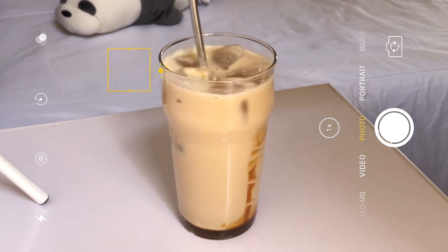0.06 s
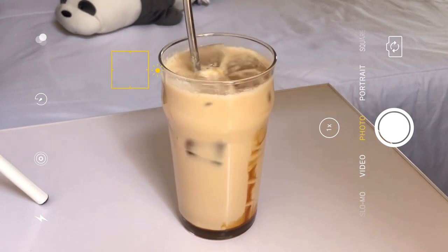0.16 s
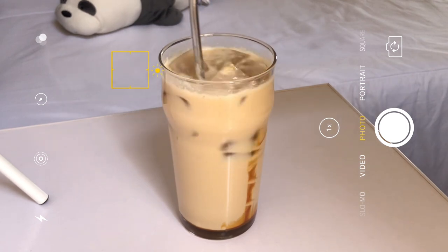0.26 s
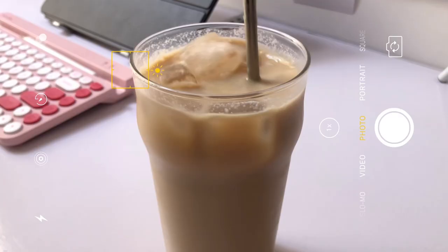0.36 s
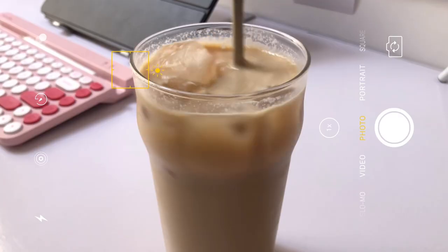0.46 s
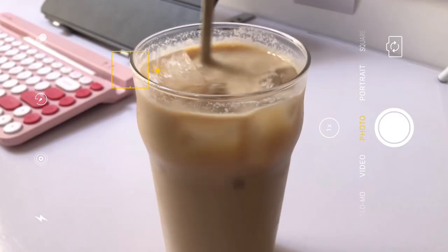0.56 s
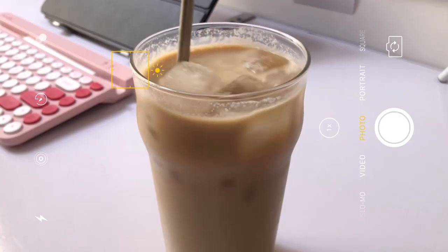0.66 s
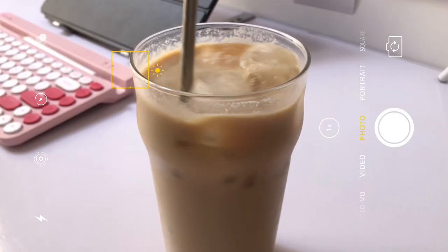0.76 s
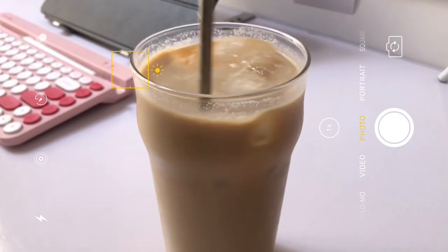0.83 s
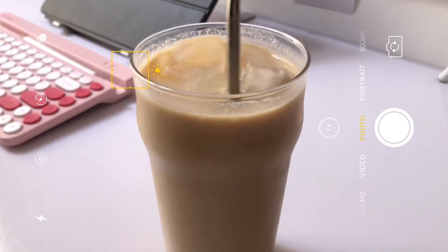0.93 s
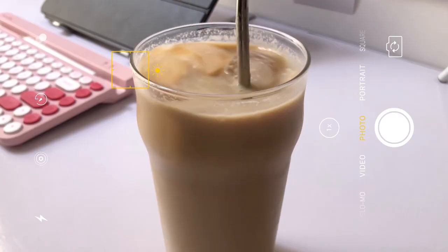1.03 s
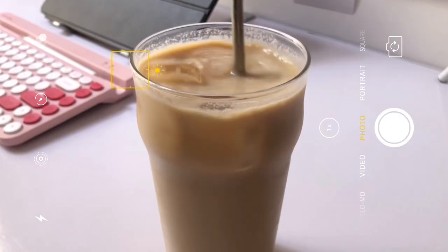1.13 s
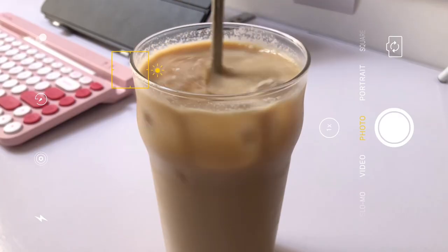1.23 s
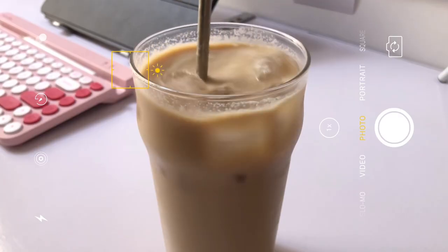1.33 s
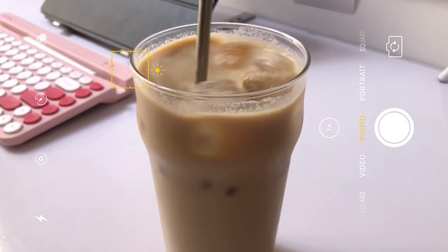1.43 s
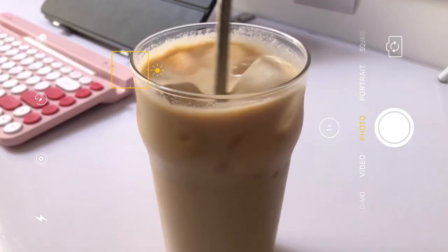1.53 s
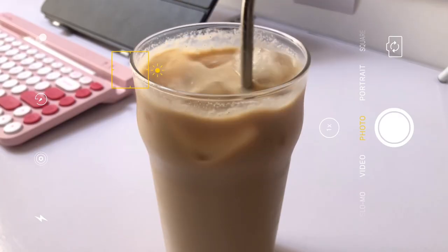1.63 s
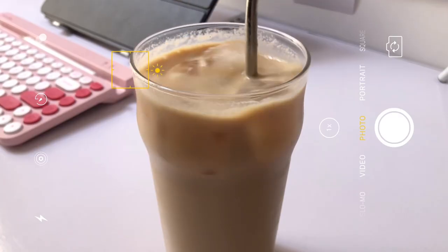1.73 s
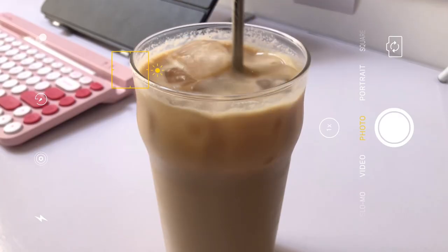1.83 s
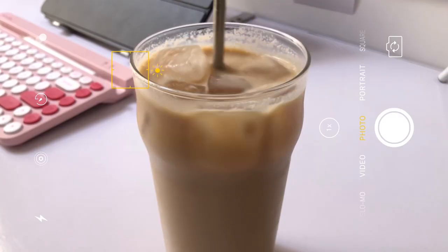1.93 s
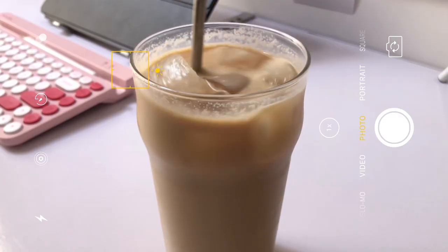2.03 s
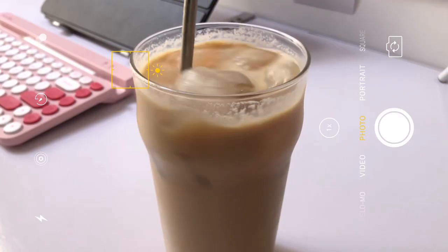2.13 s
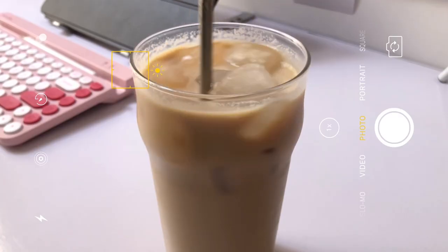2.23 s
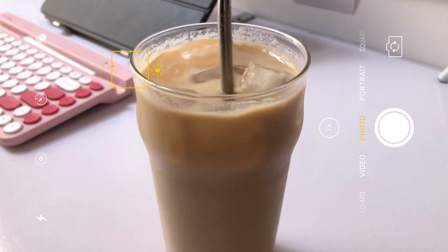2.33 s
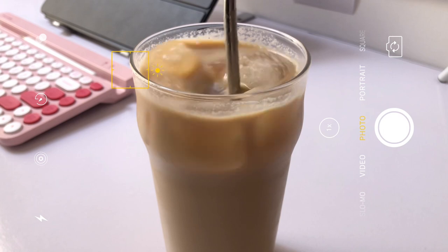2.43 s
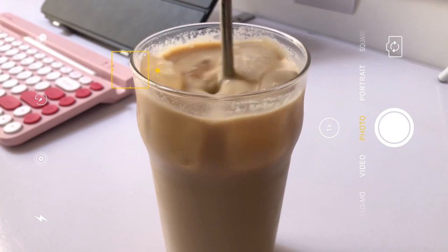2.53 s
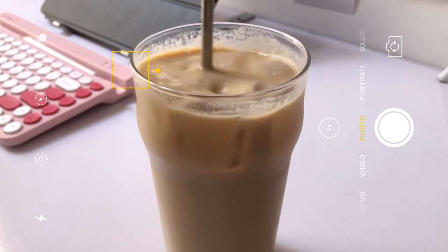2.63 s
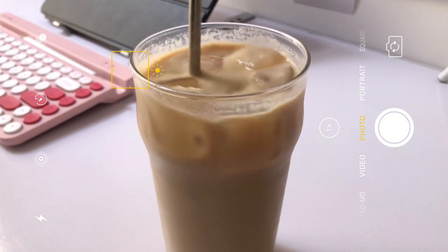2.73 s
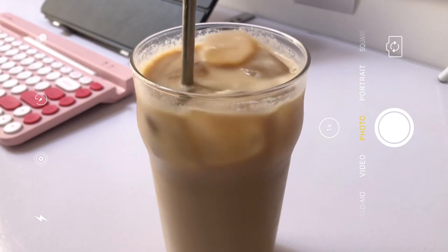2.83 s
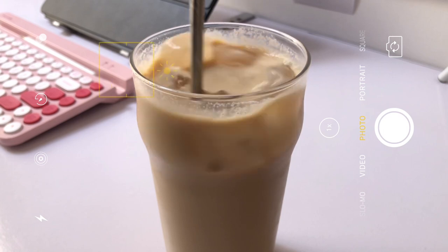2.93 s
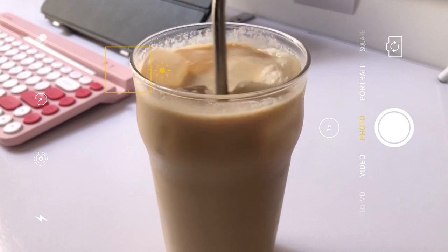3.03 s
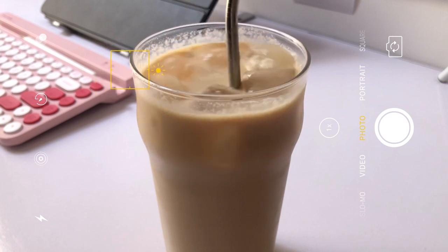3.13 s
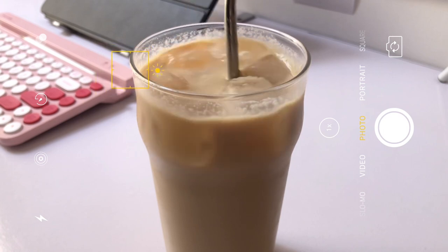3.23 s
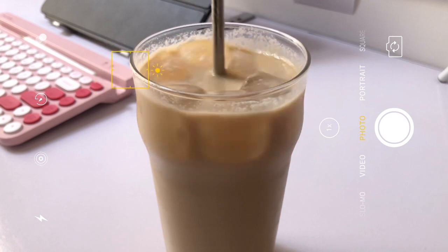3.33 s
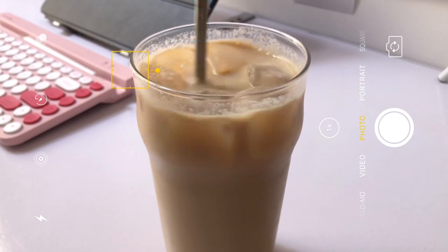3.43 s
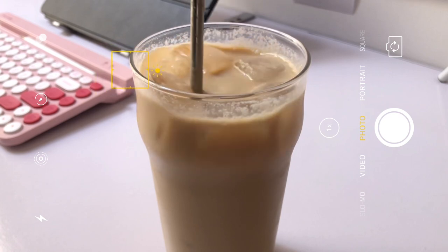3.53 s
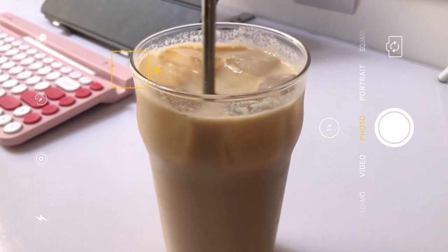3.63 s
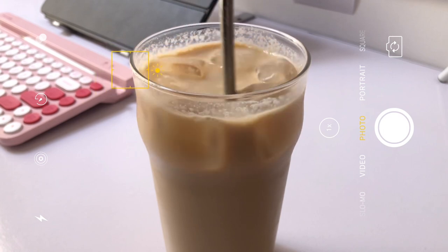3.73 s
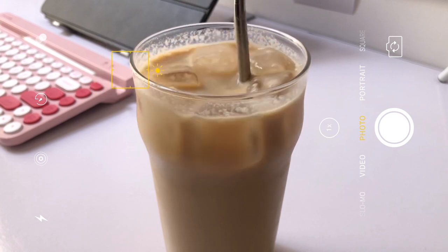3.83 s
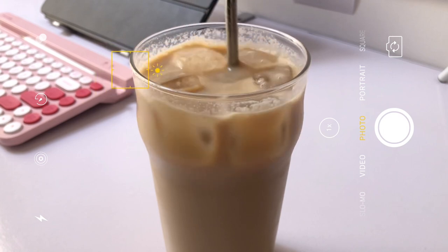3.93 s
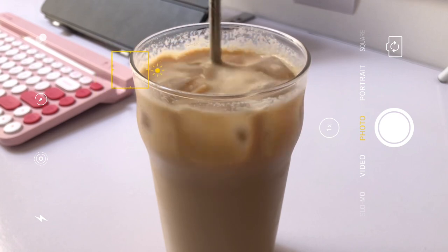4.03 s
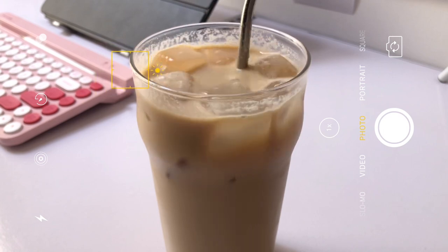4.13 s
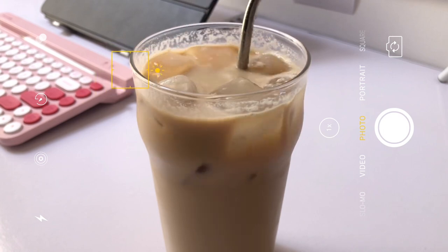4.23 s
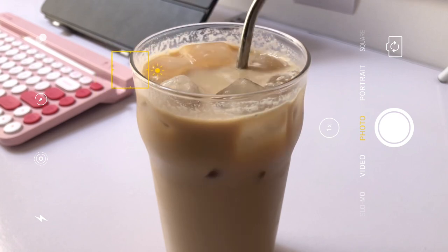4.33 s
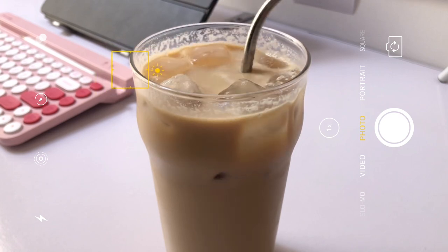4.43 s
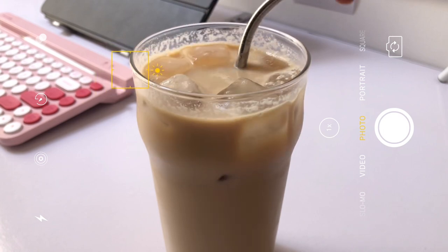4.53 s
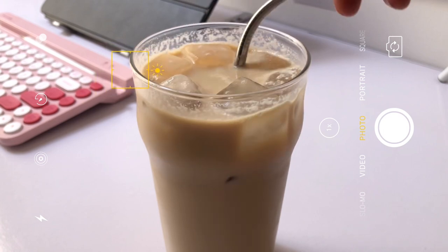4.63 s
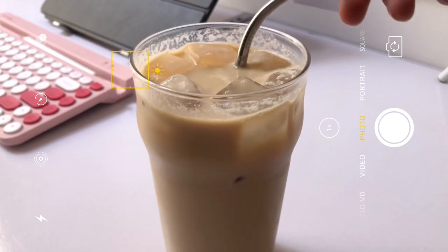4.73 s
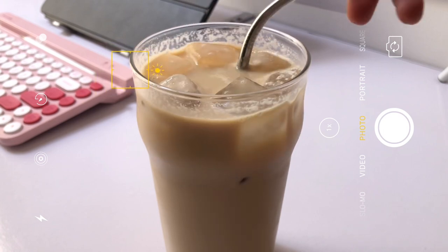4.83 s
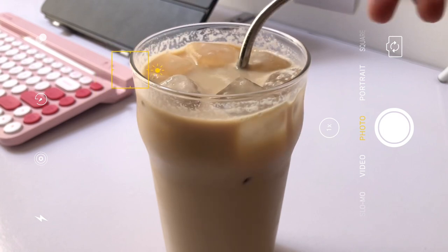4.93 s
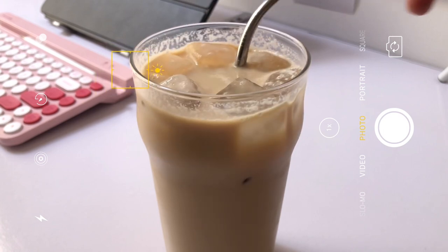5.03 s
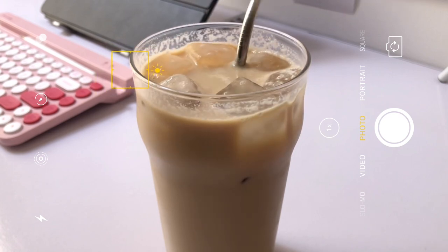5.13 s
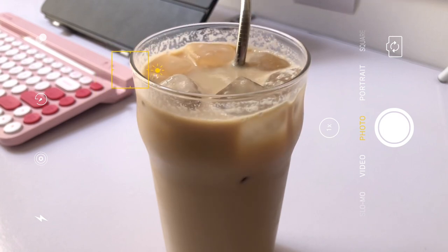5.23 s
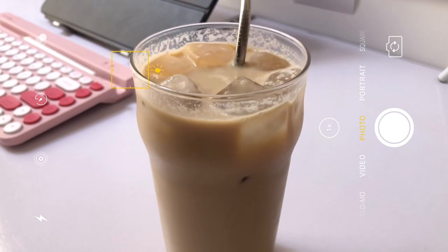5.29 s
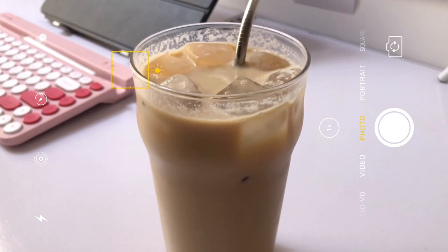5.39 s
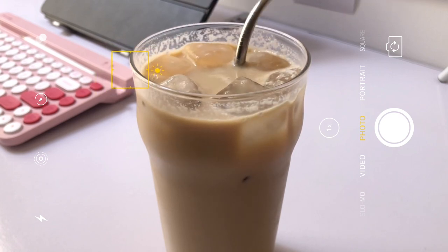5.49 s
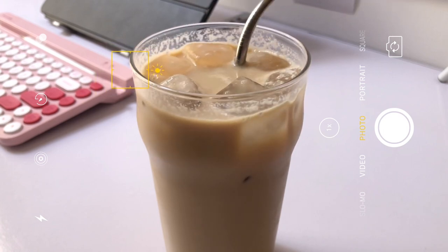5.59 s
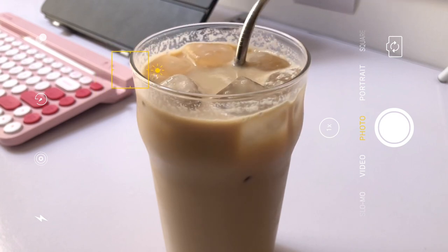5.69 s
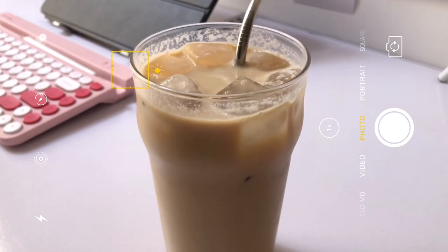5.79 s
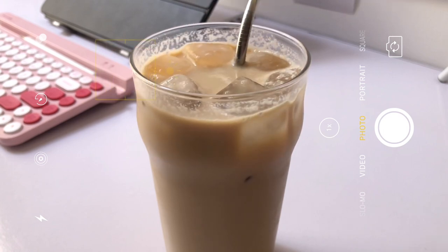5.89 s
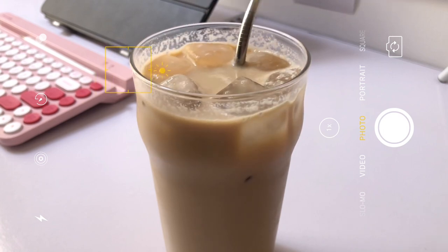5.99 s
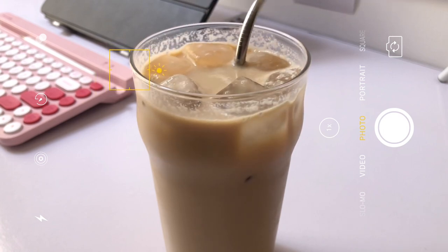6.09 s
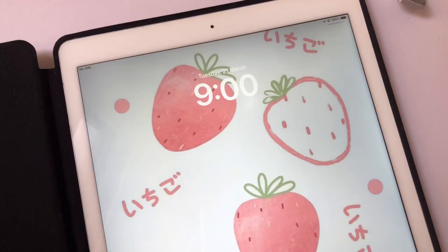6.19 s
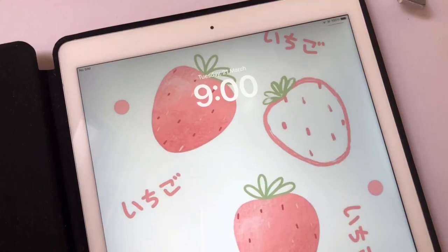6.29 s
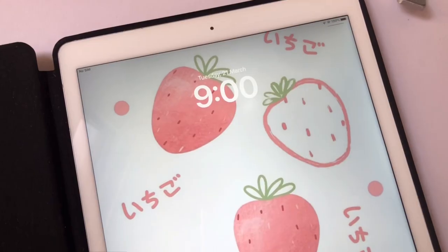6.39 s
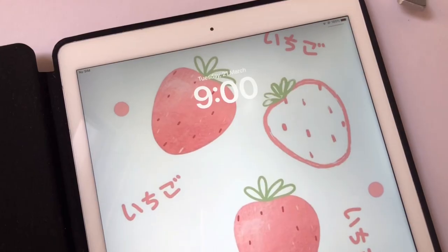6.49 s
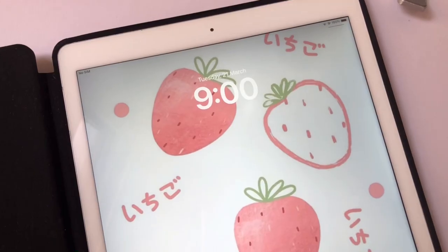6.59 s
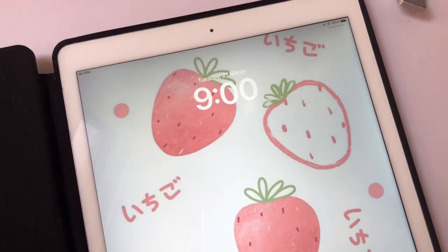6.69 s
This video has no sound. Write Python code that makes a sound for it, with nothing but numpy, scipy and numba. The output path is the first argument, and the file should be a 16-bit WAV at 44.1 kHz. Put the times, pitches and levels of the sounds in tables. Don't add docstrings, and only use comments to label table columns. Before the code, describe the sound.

A handheld phone close to an iced drink on a desk in a quiet room. Sparse clinks first, a tiny cut, then busy uneven stirring: metal straw on glass, cubes knocking the wall, small ticks between, low desk bumps. After four seconds the straw settles on the rim with a light clunk. Only low room hiss remains, with a weak distant clink and brief soft rubbing.

```python
import sys
import numpy as np
from scipy import signal
from scipy.fft import rfft, irfft
from scipy.io import wavfile
from scipy.ndimage import uniform_filter1d
from numba import njit

SR = 44100
rng = np.random.default_rng(int(sys.argv[2]) if len(sys.argv) > 2 else 0)


def store_wav(level_fs):
    pcm = np.round(np.clip(np.atleast_2d(level_fs), -1, 1) * 32767)
    wavfile.write(sys.argv[1], SR, pcm.T.astype(np.int16))


def field_ratio(decibels):
    return 10 ** (np.asarray(decibels, dtype=float) / 20)


N = 297671


def noise():
    return rng.standard_normal(N)


def level(x, db):
    return x * field_ratio(db) / np.sqrt(np.mean(x ** 2))


def band(x, hz, width):
    return signal.lfilter(*signal.iirpeak(min(hz, .45 * SR), hz / width, fs=SR), x)


def curve(rows, column=1):
    rows = np.array(rows)
    return np.interp(np.arange(N) / SR, rows[:, 0], rows[:, column], left=-150, right=-150)


def swell(rate, spread_db):
    hold = int(SR / rate)
    steps = np.repeat(rng.standard_normal(N // hold + 1), hold)
    return field_ratio(spread_db * uniform_filter1d(steps, hold)[:N])


@njit
def add(out, s, hz, t60, gain, rise):
    for k in range(len(s)):
        start = int(s[k] * SR)
        turn = np.exp(2j * np.pi * hz[k] / SR - np.log(1000) / (t60[k] * SR))
        z, contact, release = gain[k] + 0j, 1., np.exp(-1 / (rise * SR))
        for i in range(start, min(len(out), start + int(t60[k] * SR))):
            out[i] += z.imag * (1 - contact)
            z *= turn
            contact *= release


def ring(s, db, modes, spot_db, wobble, rise, lead_hz=None):
    hz, mode_db, t60 = np.transpose(modes)
    chance = rng.standard_normal((len(s), 4, len(hz)))
    if lead_hz is not None:
        mode_db = mode_db - np.minimum(60 * np.abs(np.log(hz / lead_hz[:, None])), 18)
    gain = np.sign(chance[:, 0]) * field_ratio(mode_db + spot_db * chance[:, 1])
    gain = gain * (field_ratio(db) / np.sqrt(np.sum(gain ** 2, axis=1)))[:, None]
    bent_hz = np.minimum(hz * (1 + wobble * chance[:, 2]), .45 * SR)
    bent_t60 = t60 * field_ratio(1.5 * chance[:, 3])
    out = np.zeros(N)
    add(out, np.repeat(s, len(hz)), bent_hz.ravel(), bent_t60.ravel(), gain.ravel(), rise)
    return out


def crack(s, db, lo_hz, hi_hz, t60, count=12):
    chance = rng.random((len(s), 2, count))
    place = (np.arange(count) + chance[:, 0]) / count
    pitch = lo_hz * (hi_hz / lo_hz) ** place * np.ones((len(s), 1))
    gain = field_ratio(db)[:, None] * np.exp(2j * np.pi * chance[:, 1]).real / np.sqrt(count / 2)
    out = np.zeros(N)
    add(out, np.repeat(s, count), pitch.ravel(), np.full(pitch.size, t60), gain.ravel(), .00028)
    return out


# (time [s], ring level [dB], crack level [dB], crack pitch [Hz], top level [dB])
STRIKES = [(0.1335, -40, -41.5, 5200, -40), (0.5595, -34, -22, 7600, -31.5),
           (1.4393, -29.5, -32, 6030, -45), (1.5104, -37.5, -40, 6000, -50.5),
           (1.5505, -30, -23.5, 8100, -28.5), (2.3856, -42, -45.5, 5650, -45.5),
           (2.4853, -23, -33, 4760, -47.5), (2.5255, -24, -25, 4480, -41.5), (2.622, -29, -36.5, 6170, -44),
           (2.6721, -32, -34.5, 4270, -48), (2.928, -43, -35.5, 6160, -35), (3.482, -24.5, -29, 3810, -37),
           (3.4933, -29, -25.5, 7840, -33), (3.5118, -29, -39, 4200, -47), (3.5297, -44, -37, 5440, -44.5),
           (3.746, -35, -30, 5400, -41), (3.8191, -29.5, -36, 4330, -47), (3.8424, -30.5, -28.5, 6240, -39),
           (3.8832, -25, -34.5, 4400, -43), (3.906, -25.5, -33, 6250, -41), (4.0636, -35.5, -36, 6400, -47),
           (4.1718, -31.5, -26.5, 5790, -47), (4.45, -37.5, -42, 7800, -47.5), (5.04, -46, -52, 7400, -62)]
STRIKE_RING_HZ = [3300, 3020, 2980, 3340, 2960, 2840, 2970, 3184, 2975, 3070, 2950, 2887, 2884, 2934, 2980,
                  3070, 3010, 3020, 2940, 2936, 2940, 2910, 2640, 3090]
KNOCK_RING_HZ = [3250, 2990, 3000, 2994, 2950, 2970, 2990, 2840, 2860, 2930, 2840, 3116, 2940, 2900, 2990,
                 3020, 2990, 2990, 3100, 3032, 2900, 2995, 2880, 2947, 2960, 3050, 2990]
# (time [s], ring
# level [dB], low wall mode level [dB], crack level [dB])
KNOCKS = [(0.0525, -40, -44.5, -44.5), (0.1244, -33, -42.5, -43), (0.1904, -34, -47.5, -47),
          (0.4824, -32, -48.5, -43.5), (0.5923, -38, -52, -52), (0.7668, -39, -51, -51),
          (1.0823, -34.5, -50, -46.5), (1.134, -30.5, -51, -47), (1.1477, -41, -47, -40.5),
          (1.1612, -32.5, -44.5, -43.5), (1.187, -37.5, -45.5, -46), (1.3325, -36.5, -50.5, -46.5),
          (1.4723, -39, -57, -50), (1.491, -36, -58, -49), (1.568, -31.5, -47.5, -38.5),
          (1.6332, -26.5, -43, -40.5), (1.7223, -35, -54.5, -41), (1.785, -34, -48.5, -52),
          (1.921, -34, -54.5, -40.5), (2.6854, -26.5, -49, -34.5), (2.7753, -36.5, -54, -45),
          (2.9789, -26, -43, -40), (3.3292, -32, -45, -36.5), (3.344, -26.5, -48, -33),
          (3.4375, -35.5, -47.5, -48), (3.6331, -34.5, -47.5, -39.5), (3.677, -31.5, -52, -35.5)]
NUDGES = [(0.0229, -45, -48, -61), (0.0405, -42, -44, -50), (0.2125, -41.5, -48, -58),
          (0.6967, -42, -58.5, -48), (1.0944, -43, -52, -53), (1.2908, -40.5, -61, -61),
          (1.4174, -42, -50.5, -48), (1.5025, -40.5, -56, -39.5), (1.6596, -40.5, -49.5, -53),
          (1.7018, -47, -54, -48), (1.7476, -41, -53, -59), (1.7694, -38, -56, -52.5),
          (1.8296, -36.5, -57, -47.5), (2.1018, -44.5, -54, -51), (2.4234, -50, -48, -63),
          (2.5404, -43, -45, -53), (2.5602, -36.5, -45.5, -47), (2.6495, -35.5, -44, -50),
          (2.8627, -39, -69, -54), (2.9384, -43, -50, -44), (3.0517, -42, -55, -45.5),
          (3.1253, -40.5, -48.5, -55), (3.242, -46.5, -50, -52), (3.3029, -39.5, -49, -48),
          (3.4009, -37, -46, -40.5), (3.4176, -33, -49.5, -48), (3.5417, -35, -59, -46),
          (3.6027, -41.5, -61, -45),
          (0.2895, -58, -53, -70), (0.4304, -49, -53, -60), (0.4565, -36.5, -51.5, -41),
            (0.7027, -56, -52, -46), (0.7231, -51, -55, -54.5), (0.9112, -57, -57.5, -60.5),
            (1.0066, -53, -56.5, -63), (1.4564, -35, -51.5, -51), (1.6107, -40, -51, -52),
            (2.114, -42.5, -48, -43), (2.2368, -51.5, -58.5, -41.5), (2.7154, -47, -46, -59),
            (3.1742, -46.5, -55.5, -57), (3.5658, -43, -50, -52), (3.589, -44, -59, -49),
            (3.6206, -40, -52.5, -47), (3.7274, -34, -50.5, -44.5), (3.7715, -45, -64, -51.5),
            (3.98, -43, -51, -53), (4.0205, -44.5, -68, -53), (4.1036, -44, -55, -54.5),
            (4.2014, -63, -54, -50), (4.435, -40, -57, -55), (4.5341, -41, -53.5, -52),
            (4.7274, -68, -66, -75), (4.7655, -58, -70, -68),
          (0.0097, -49, -52, -62), (0.5194, -43, -53.5, -52), (0.5358, -34.5, -57, -45.5),
            (0.954, -59, -59, -66), (1.0628, -45, -54, -56), (1.077, -44, -54, -50),
            (1.4272, -37, -47.5, -44.5), (2.47, -54, -48, -60), (2.5112, -33.5, -50, -43),
            (2.617, -40, -61, -48), (2.659, -45, -44, -64), (2.913, -61, -55.5, -60),
            (3.031, -50, -52, -51), (3.3202, -42, -47, -58), (3.3558, -47, -51, -46), (3.39, -54, -49, -50),
            (3.464, -44, -62, -59.5), (3.684, -42, -67, -51), (4.0388, -42.5, -53.5, -48),
            (4.05, -41, -50.5, -56), (4.5462, -42, -53, -59), (4.5589, -44, -55, -54.5),
            (4.819, -66, -77, -77)]
# (crack pitch [Hz], top level [dB])
KNOCK_COLOUR = [(8170, -63), (5560, -67), (5360, -64), (3700, -65.6), (7950, -67), (3830, -66.9),
                (4110, -70.6), (3700, -66.8), (4220, -67.0), (6440, -60.7), (3770, -56), (3700, -69.1),
                (4110, -71), (3700, -68.5), (4110, -58), (3970, -59.2), (4560, -63.3), (4180, -68),
                (6220, -61), (4350, -57), (4500, -72), (6150, -63.5), (3680, -62.0), (6250, -63.0),
                (3940, -72), (4460, -73.0), (4330, -53.9)]
NUDGE_COLOUR = [(3700, -79.7), (4940, -72), (3700, -82.9), (4700, -68), (8830, -68.0), (4070, -76.3),
                (3710, -62.3), (6800, -61.3), (3700, -68.5), (4600, -68), (6440, -69), (4800, -70),
                (3720, -69.4), (3640, -57), (3700, -78.2), (4480, -64), (4330, -62.5), (3700, -66.1),
                (3700, -78), (3700, -62), (3750, -65.9), (3680, -73), (5500, -73.2), (6240, -65.6),
                (4350, -60), (3700, -70), (4540, -65.2), (5550, -59),
                (4010, -82), (4330, -79.8), (6350, -58), (4770, -54), (4330, -69), (6300, -71),
                   (6350, -73), (3700, -59.7), (3700, -67.5), (4390, -65), (5800, -56), (3900, -65.5),
                   (3700, -77.9), (3700, -74.5), (5450, -65.5), (4370, -74.3), (3670, -69.9), (5040, -68),
                   (6400, -69.2), (6350, -79.9), (6120, -75.3), (5700, -74.5), (6120, -70.9), (7800, -72),
                   (4740, -81.2), (6350, -86),
                (4110, -79.5), (4200, -69.9), (6160, -63), (3980, -81.7), (6220, -73.0), (3810, -64.0),
                  (4410, -62), (6460, -76.7), (3700, -65.5), (6240, -58), (3700, -77.6), (6370, -75.8),
                  (3730, -74.5), (3700, -71.8), (6010, -72.1), (6440, -68), (5640, -83.5), (4500, -73.8),
                  (3700, -63.8), (6310, -69.2), (6700, -75.0), (4590, -69.6), (3920, -85.1)]
# (time [s], ring level [dB], crack level [dB])
TICKS = [(0.0447, -44, -47.5), (0.116, -56, -56), (0.156, -51, -57), (0.2621, -56, -64), (0.401, -57, -64),
         (0.4094, -60.5, -68), (0.708, -52, -55), (0.7326, -60, -56), (0.8319, -60, -67),
         (0.9771, -54, -65), (1.0471, -54, -60), (1.054, -50, -62), (1.2234, -60, -70),
         (1.3267, -48, -54.5), (1.3484, -44, -62), (1.3662, -61, -57), (1.3743, -47, -57),
         (1.3969, -55, -66), (1.4868, -44.5, -49.5), (1.6059, -48, -55), (1.6757, -53, -58),
         (1.7142, -48, -64), (1.8443, -54, -53.5), (1.8484, -50, -60), (1.9026, -54, -60),
         (1.944, -51, -62), (1.978, -55, -63), (2.0482, -63, -68), (2.0895, -47, -68), (2.201, -55, -69.5),
         (2.3426, -60.5, -70), (2.3914, -48.5, -55), (2.4003, -47, -60), (2.4367, -52, -64),
         (2.4517, -51.5, -62), (2.4651, -57.5, -60), (2.5177, -41, -54.5), (2.5897, -53, -59),
         (2.6048, -52, -58), (2.6386, -45, -52.5), (2.6885, -29, -36.5), (2.7, -52, -45),
         (2.7257, -44, -60), (2.7883, -51, -66), (2.9596, -51, -59), (3.0003, -52, -60), (3.0923, -52, -60),
         (3.1096, -50, -54), (3.1516, -52, -63), (3.166, -56, -63), (3.3773, -44, -55), (3.6944, -45, -54),
         (3.6988, -45, -59), (3.7577, -56, -52), (3.8, -51.5, -52), (3.832, -43, -56), (3.8721, -51, -49),
         (3.9897, -50, -62), (4.2305, -61, -58), (4.486, -51.5, -69)]
# (lowest [Hz], highest [Hz])
TICK_RANGE = (4200, 6770)


def contacts():
    wall_ring_hz = 2990
    s, ring_db, crack_db, hz, top_db = np.transpose(STRIKES)
    wall_db = -26.5 + 0.58 * ring_db
    straw = [s, ring_db, wall_db, crack_db, hz, top_db + 10, STRIKE_RING_HZ]

    s, ring_db, wall_db, crack_db = np.transpose(KNOCKS + NUDGES)
    hz, top_db = np.transpose(KNOCK_COLOUR + NUDGE_COLOUR)
    ring_hz = np.append(KNOCK_RING_HZ, np.full(len(s) - len(KNOCKS), wall_ring_hz))
    ice = [s, ring_db, wall_db + 2, crack_db, hz, top_db + 12, ring_hz]

    s, ring_db, crack_db = np.transpose(TICKS)
    lo_hz, hi_hz = TICK_RANGE
    hz = lo_hz * (hi_hz / lo_hz) ** rng.random(len(s))
    ring_hz = np.full(len(s), wall_ring_hz)
    tick = [s, ring_db - 0.5, ring_db - 11.5, crack_db - 3.5, hz, crack_db - 4.5, ring_hz]

    rows = np.concatenate([straw, ice, tick], axis=1)
    ring_gain_db, crack_gain_db = 1, 6
    return rows + np.array([0, ring_gain_db, 0, crack_gain_db, 0, 0, 0])[:, None]


# (frequency [Hz], level [dB], decay t60 [s])
WALL = [(404.4, -7, 0.11), (597.3, -0.5, 0.051), (753.8, 4.5, 0.052), (823, -4, 0.082), (1656, -2, 0.022),
        (1765, 0, 0.042)]
# (frequency [Hz], level [dB], decay t60 [s])
RING = [(2655, -14.5, 0.036), (2935, -0.5, 0.027), (3028, -2.5, 0.029), (3104, -3, 0.028),
        (3250, -3.5, 0.024)]


def knocks(s, ring_db, wall_db, ring_hz):
    glass = np.zeros(N)
    add(glass, s, ring_hz, np.full(len(s), .03), field_ratio(ring_db + 4), .0012)
    glass += ring(s, ring_db - 3, RING, spot_db=5.0, wobble=0.014, rise=0.00028)
    glass += ring(s, wall_db + .1, WALL[:4], spot_db=3.0, wobble=.012, rise=.004)
    glass += ring(s, wall_db - 2.5, WALL[4:], spot_db=4.0, wobble=.015, rise=.0008)
    glass += crack(s, ring_db - 14.0, 3800, 11000, t60=0.008, count=20)
    glass += crack(s, wall_db + 1.5, 1000, 2700, t60=0.023)
    glass += crack(s, ring_db - 8, 1804, 3800, t60=0.018)

    chance = rng.random((len(s), 2, 3))
    later = (s[:, None] + .006 - .014 * np.log(chance[:, 0] + 1e-2)).ravel()
    softer_db = (ring_db[:, None] - 19.0 - 12 * chance[:, 1]).ravel()
    glass += ring(later, softer_db, RING, spot_db=2.5, wobble=0.0035, rise=0.00043)
    return glass + crack(later, softer_db - 5, 1500, 14000, t60=.008, count=24)


# (frequency [Hz], level [dB], decay t60 [s])
STRAW = [(4040, -8, .02), (4480, -1.5, 0.021), (4870, -18, 0.0198), (5500, 2, 0.026), (6280, 10.5, 0.017),
         (6510, -27, .04), (7850, -1, 0.032)]
# (frequency [Hz], level [dB], decay t60 [s])
TOP = [(10500, -6, .025), (13100, -9, .02), (14800, 0, .02)]


def clicks(s, click_db, hz, top_db):
    pitch = hz[:, None]
    sharp = crack(s, click_db - 0.5, 3360, 9520, t60=0.0059, count=20)
    sharp += crack(s, click_db, 0.96 * pitch, 1.047 * pitch, t60=0.0077, count=4)
    sharp += crack(s, top_db - 2.0, 9670, 15900, t60=0.0083, count=20)
    sharp += crack(s, click_db - 0.5, 0.622 * pitch, 1.53 * pitch, t60=0.0032, count=10)
    straw = ring(s, click_db - 9.5, STRAW, spot_db=3.0, wobble=0.014, rise=0.000301, lead_hz=hz)
    return sharp + straw + ring(s, top_db - 16.5, TOP, spot_db=7.5, wobble=0.018, rise=.0003)


# (time [s], level [dB])
STIR = [(0.0, -1.5), (0.35, -10), (0.79, -5.5), (1.2, -2.5), (1.67, 3), (2.12, -2.5), (2.6, 1), (3.15, -4),
        (3.62, -0.5), (3.95, 2), (4.29, -9.5), (4.6, -13.5), (5.0, -35.5)]


def effort(db, slope):
    return db + slope * curve(STIR)


def jostling():
    chance = rng.random((800, 2))
    s = chance[:, 0] * STIR[-1][0]
    size_db = effort(-62, 1.5)[(s * SR).astype(int)] - 4.5 * np.log(chance[:, 1] + 0.0103)
    small = ring(s, size_db - 13.5, RING, spot_db=1.0, wobble=.015, rise=0.000675)
    low_hz = 1300 * 3.2 ** rng.random((len(s), 1))
    small += crack(s, size_db - 5, low_hz, 2.1 * low_hz, t60=0.016, count=10)
    small += crack(s, size_db - 8.0, 8000, 16000, t60=0.0073, count=10)
    watery = ring(s[::3], size_db[::3] - 9.0, WALL[:5], spot_db=1.5, wobble=0.062, rise=.003)
    return small + watery


def slosh():
    flow = np.zeros(N)
    for hz, db, t60 in WALL[:4]:
        flow += field_ratio(db) * band(noise(), hz, 14.0 / t60) * swell(14, spread_db=5.5)
    flow += field_ratio(-0.5) * band(noise(), 940, 98) * swell(15, spread_db=6.0)
    flow += field_ratio(-11.0) * band(noise(), 1400, 900) * swell(25, spread_db=3.5)
    flow += field_ratio(-2.5) * band(noise(), 3070, 163) * swell(30, spread_db=-0.5)
    flow += field_ratio(-18) * band(noise(), 3806, 4000) * swell(45, spread_db=5.0)

    first = band(noise(), 940, 200) + field_ratio(-13) * band(noise(), 1500, 900)
    first *= field_ratio(-25 * np.arange(N) / SR) * (np.arange(N) < HOLE[0] * SR)
    first = level(first * swell(39.8, spread_db=3.5), -71.0)
    return level(flow, -1.8) * field_ratio(effort(-62.5, 0.97)) + first


def room(x, t60, early_t60, early_db, late_db):
    t = np.arange(int(.4 * SR)) / SR
    early = rng.standard_normal(len(t)) * field_ratio(-60 * t / early_t60)
    late = band(rng.standard_normal(len(t)), 3000, 4700) * field_ratio(-60 * t / t60)
    late *= 1 - np.exp(-t / 0.03)
    tail = field_ratio(early_db) * early / np.sqrt(np.sum(early ** 2))
    tail += field_ratio(late_db) * late / np.sqrt(np.sum(late ** 2))
    return x + signal.fftconvolve(x, tail)[:N]


# (time [s], level [dB], pitch [Hz])
THUMPS = [(0.052, -55, 109), (0.263, -55, 106), (0.56, -50, 175), (0.7, -51, 164), (0.83, -53, 145),
          (0.969, -52.5, 191), (1.271, -56, 153), (1.333, -54, 123), (1.545, -55, 137), (1.641, -46, 153),
          (1.876, -55.5, 120), (2.128, -52, 190), (2.417, -43.5, 132), (2.474, -44, 180),
          (2.551, -49.5, 114), (2.733, -54.5, 175), (2.93, -52, 170), (2.987, -53, 170), (3.139, -58, 119),
          (3.349, -50, 152), (3.527, -45, 118), (3.849, -47, 156), (3.918, -41, 141), (4.046, -50.5, 170),
          (4.175, -45, 121)]
# (frequency [Hz], level [dB], decay t60 [s])
DESK = [(79, 1.5, 0.29), (112.5, -11, 0.45), (139, 0.5, 0.095), (168.7, 2.5, 0.17), (311.5, -7.5, 0.38),
        (393, -1.5, 0.071)]


def desk():
    s, db, hz = np.transpose(THUMPS)
    thump = ring(s, db + 3.5, DESK, spot_db=2.5, wobble=0.045, rise=0.0066, lead_hz=hz)
    hum = np.zeros(N)
    for hz, db, t60 in DESK:
        hum += field_ratio(db) * band(noise(), hz, 6 / t60) * swell(9, spread_db=5.5)
    return thump + level(hum, -1.7) * field_ratio(effort(-60.5, .7))


# (time [s], level [dB])
DROP = [
    (4.451, -35),
]
# (frequency [Hz], level [dB], decay t60 [s])
ROCK = [(118, -9, 0.7), (175, -4, 0.2), (371, 3.5, 0.041), (522, -4, 0.04)]


def straw_drop():
    s, db = np.transpose(DROP)
    fall = ring(s, db + 0.5, ROCK, spot_db=-0.5, wobble=.001, rise=0.00037)
    fall += crack(s, db - 12, 236, 1510, t60=0.074, count=30)
    fall += crack(s, db - 12, 2300, 3100, t60=0.084, count=14)
    fall += ring(s, db - 14, TOP, spot_db=0.6, wobble=.005, rise=.0003)
    return fall + crack(s, db - 19, 4000, 15500, t60=0.059, count=60)


def murmur(body, tables, grain_db, late_s):
    grain = uniform_filter1d(np.repeat(rng.standard_normal(N // 300 + 1), 300), 200)[:N]
    envelope = sum(field_ratio(curve(rows)) for rows in tables) * field_ratio(grain_db * grain)
    out = np.zeros(N)
    for hz, width, db in body:
        lag = int(late_s * SR * abs(np.log2(body[0][0] / hz)))
        tone = band(band(noise(), hz, width), hz, 2 * width)
        out += np.roll(envelope, lag) * level(tone, db)
    return out


# (time [s], level [dB])
FAR = [
    [(2.125, -87), (2.145, -69), (2.24, -81)],
    [(5.104, -87), (5.112, -66), (5.22, -81)],
]
# (frequency [Hz], width [Hz], level [dB])
FAR_BODY = [(4340, 580, -3), (5650, 250, 1.5), (3730, 640, -1.5), (2820, 220, -2), (2100, 960, -5)]


def far_clinks():
    return murmur(FAR_BODY, FAR, grain_db=-1.0, late_s=0.039)


# (time [s], level [dB])
RUSTLE = [
    [(5.40, -87), (5.44, -74), (5.49, -76), (5.52, -93)],
    [(6.55, -88.5), (6.58, -68.5), (6.62, -83), (6.66, -75), (6.69, -64.5), (6.75, -64.5)],
]
# (frequency [Hz], width [Hz], level [dB])
RUSTLE_BODY = [(862, 61, -2), (606, 140, -5), (2060, 850, -8.5), (3860, 3040, -8)]


def rustle():
    return murmur(RUSTLE_BODY, RUSTLE, grain_db=-2.0, late_s=0)


# (frequency [Hz], density [dB per Hz])
HUSH = [(19, -37), (32, -10.5), (117, -3.5), (160, -10.5), (355, -16), (1290, -28.5), (3000, -33),
        (15500, -40.5)]


def hush():
    hz, db = np.transpose(HUSH)
    f = np.arange(N // 2 + 1) * SR / N + 1
    shape = field_ratio(np.interp(np.log(f), np.log(hz), db)) * (f < 15900)
    return level(irfft(rfft(noise()) * shape, N), -65.5)


def scene():
    s, ring_db, wall_db, crack_db, hz, top_db, ring_hz = contacts()
    glass = knocks(s, ring_db, wall_db, ring_hz) + clicks(s, crack_db, hz, top_db)
    glass += jostling() + slosh()
    near = room(glass, t60=0.21, early_t60=0.019, early_db=-7.5, late_db=-24.0)
    return (near + desk() + straw_drop() + far_clinks() + rustle() + hush())[None]


# (start [s], end [s])
HOLE = (.391, .400)


def roll_off(x):
    return signal.sosfilt(signal.butter(12, 17090, fs=SR, output="sos"), x)


def record(dry):
    heard = signal.sosfilt(signal.butter(3, 34, "high", fs=SR, output="sos"), dry)
    heard = heard + field_ratio(-5) * band(heard, 15300, 2500)
    t = np.arange(N) / SR
    outside = np.maximum(HOLE[0] - t, t - HOLE[1])
    return roll_off(heard * np.clip(outside / 0.0016, .2, 1))


dry = scene()
out = record(dry)
store_wav(out)
```